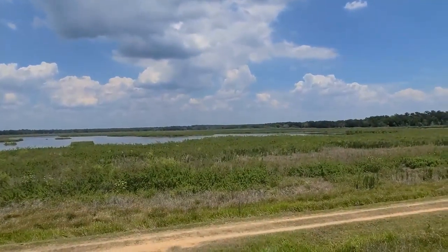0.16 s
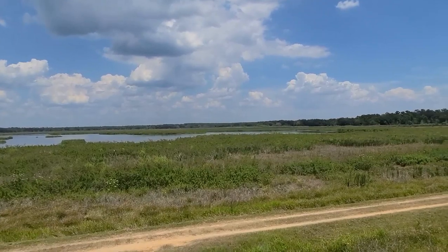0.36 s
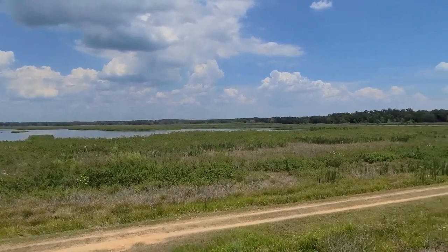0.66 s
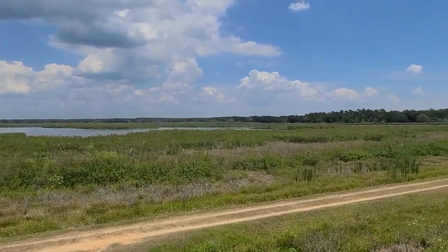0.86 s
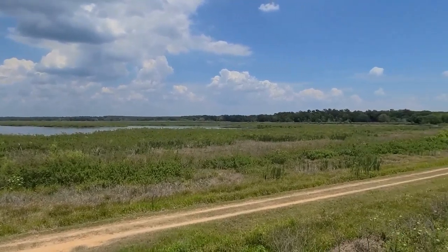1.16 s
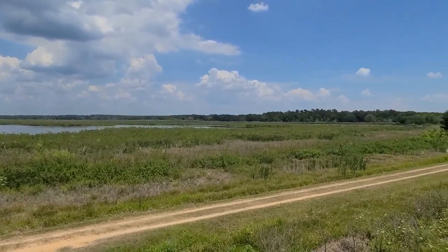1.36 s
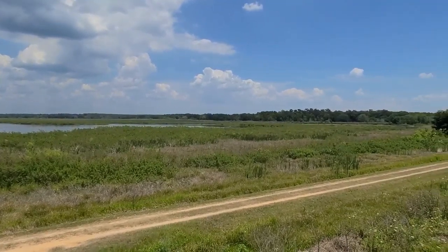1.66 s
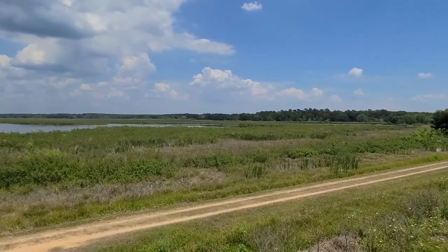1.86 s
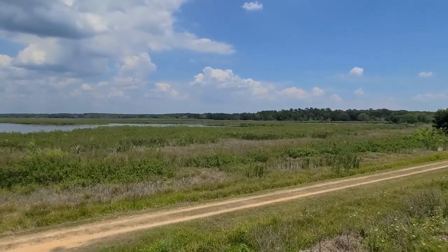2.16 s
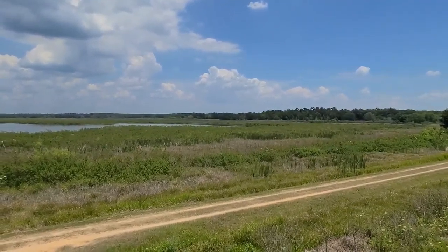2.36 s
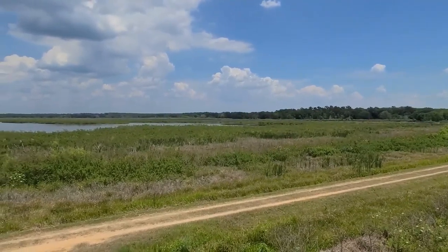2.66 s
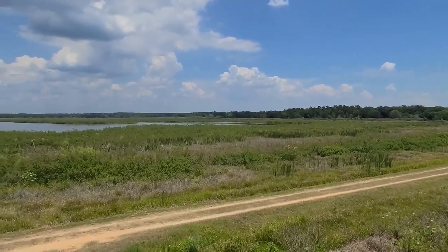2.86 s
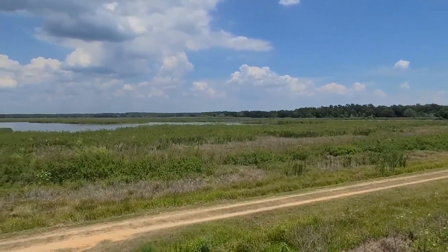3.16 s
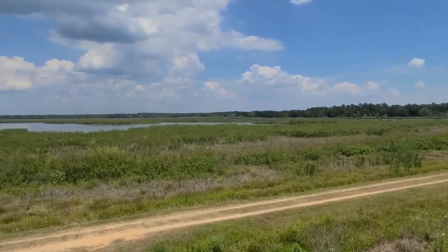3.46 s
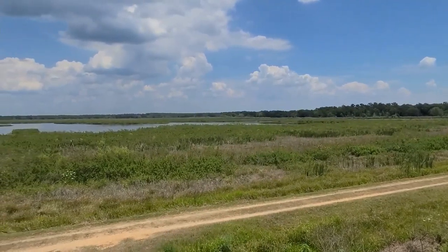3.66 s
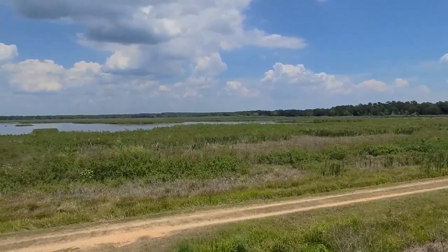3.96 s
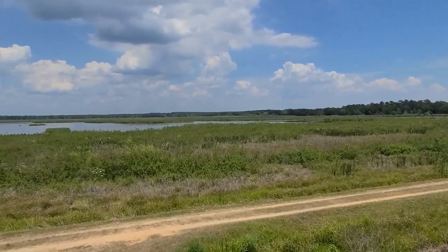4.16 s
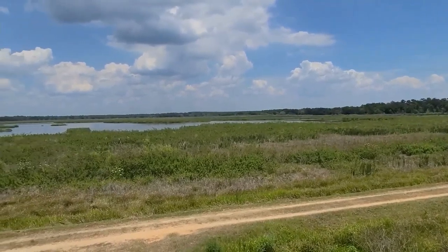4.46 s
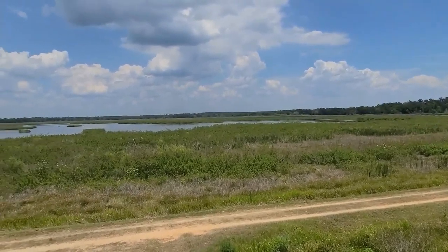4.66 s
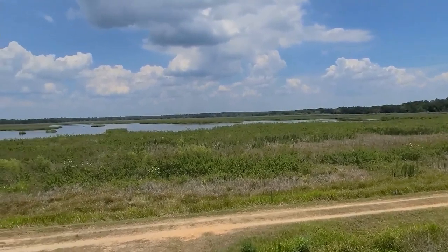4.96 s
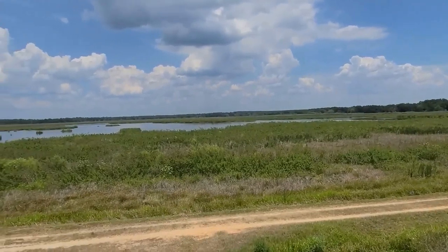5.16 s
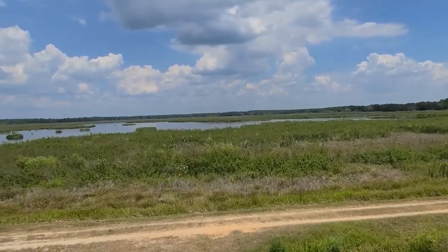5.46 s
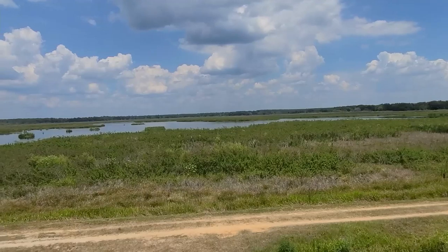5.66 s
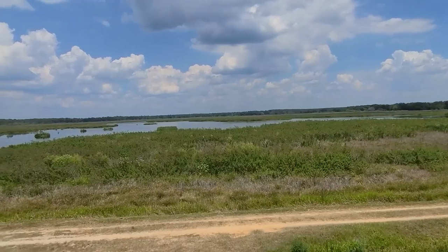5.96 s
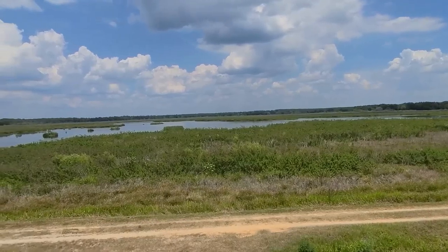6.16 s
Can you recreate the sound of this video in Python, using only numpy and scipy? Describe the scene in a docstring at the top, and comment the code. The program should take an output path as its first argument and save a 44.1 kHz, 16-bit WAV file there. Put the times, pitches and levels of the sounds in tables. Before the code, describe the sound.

A breezy wetland with nothing close by except the hands holding the microphones. Soft bassy wind buffets come and go, with early thumps, finger creaks and one clear plastic knock near one second. Short bird whistles dot the right side, thinning later. A steady shimmering cricket trill leans left until about four and a half seconds, then a higher, fainter one remains, above a faint, slowly swelling engine drone.

```python
"""Crickets trill over an open marsh: two near, two fainter, before a blur of far insects. Birds chirp, mostly
from the right, a far engine hums, wind sighs in the reeds and buffets two microphones a hand apart, and the
hand-held case is knocked, creaks and is brushed. Trills are phase-slipping tones gated by wing stroke, birds
are gliding sines, the engine is steady sines, wind and far insects are shaped noise, the knock rings decaying
modes; scattered echoes follow the trills and chirps."""
import sys
import numpy as np
from scipy import signal
from scipy.fft import rfft, irfft, next_fast_len
from scipy.io import wavfile
from scipy.ndimage import uniform_filter1d, map_coordinates

SR = 44100
rng = np.random.default_rng(int(sys.argv[2]) if len(sys.argv) > 2 else 0)


def field_ratio(decibels):
    """Amplitude ratio for a level in dB (20 dB per decade); scalars and array-likes work."""
    return 10 ** (np.asarray(decibels, dtype=float) / 20)


def to_wav(sig):
    """Store sig (one row per channel, or 1-D mono) as 16-bit WAV at the path in sys.argv[1].

    Samples outside -1..1 are clipped; the rate is SR.
    """
    pcm = np.clip(np.atleast_2d(sig), -1, 1) * 32767
    pcm = np.round(pcm).astype(np.int16)
    wavfile.write(sys.argv[1], SR, pcm.T)  # frames by channels


N = 277863
T = np.arange(N) / SR  # s

# Far insects. Each row: time in seconds, level in dB, left minus right in dB.
CHORUS = [(0, -73, -2), (1.0, -74.5, -0.5), (6.3, -76, 3)]
# Far insects' spectrum. Each row: frequency in Hz, relative density in dB per Hz.
CHORUS_SPECTRUM = [(5000, -120), (6700, -39), (7400, -8), (8200, -1), (8800, -4), (9600, -7.5),
                   (10500, -11), (11300, -20), (14000, -120)]

# Far engine. Each row: time in seconds, fundamental level in dB, octave level in dB.
HUM = [(0.0, -70, -54), (0.7, -57.5, -72), (1.52, -53.5, -62), (2.39, -53, -66), (3.1, -50.5, -56.5),
       (3.53, -54, -70), (4.38, -46.5, -63.5), (4.65, -56.5, -62.5), (5.56, -46.5, -59.5),
       (5.84, -54.5, -58), (6.3, -46.5, -56)]
HUM_HZ = 76.24
# Fainter rising engine tone. Each row: time in seconds, frequency in Hz, level in dB.
WHINE = [(3.4, 383, -86), (4.4, 390, -77), (5.2, 398, -73), (6.3, 406, -72)]

# Wind over the marsh. Each row: time in seconds, low sigh level in dB, reed hiss level in dB.
WIND = [(0, -56, -62), (1.1, -57.5, -64), (2.8, -57, -66), (4.1, -56.5, -67.5), (6.3, -55, -66.5)]
# Low sigh's spectrum. Each row: frequency in Hz, relative density in dB per Hz.
SIGH_SPECTRUM = [(50, -35.5), (85, -0.5), (119, -9.5), (254, -13), (325, -17), (405, -18), (611, -26),
                 (920, -32), (1200, -36), (1560, -66), (2640, -120)]
# Low sigh's stereo likeness. Each row: frequency in Hz, left-right correlation (1 is identical).
SIGH_ALIKE = [(60, 1), (250, 0.87), (550, 0.82), (1100, 0.6)]
# Reed hiss spectrum. Each row: frequency in Hz, relative density in dB per Hz.
REEDS_SPECTRUM = [(400, 3.5), (900, -2), (1500, -3.5), (2200, -10.5), (3200, -7), (4200, -13.5),
                  (5200, -18), (7000, -20), (11000, -43)]
# Wind on the microphone ports. Each row: time in seconds, buffet level in dB.
GUSTS = [(0, -50.5), (.55, -51), (.62, -60.5), (1.15, -55), (1.9, -58), (2.2, -47.5), (3.1, -49.5),
         (3.3, -54.5), (5, -58), (5.4, -53), (6.3, -52)]
# Buffet spectrum. Each row: frequency in Hz, relative density in dB per Hz.
BUFFET_SPECTRUM = [(12, -13), (25, -5), (40, 2.5), (62, 4.5), (85, -5.5), (120, -14.5), (200, -27.5),
                   (400, -37), (1000, -120)]
# Single eddies that thump the ports. Each row: centre in seconds, level in dB.
EDDIES = [(.07, -41.5), (.37, -37), (.47, -43.5), (2.258, -44), (2.39, -47), (2.49, -48.5), (2.7, -45.5),
          (5.071, -45.5), (5.37, -49), (5.88, -49)]
EDDY_S = 0.026

# Small bird on the right, quick high notes. Each row: centre in seconds, pitch in Hz, glide in Hz, level in dB.
TWITTER = [(.589, 4080, 270, -74.5), (0.667, 3935, -100, -64), (.768, 3770, -300, -66),
           (.918, 3530, -300, -65.5), (1.018, 3750, -100, -68.5), (1.554, 3400, -12, -67),
           (1.656, 3540, -100, -69), (1.815, 4170, -20, -77), (1.885, 3870, 8, -66.5),
           (2.02, 3550, -230, -61), (2.121, 3780, -30, -63.5), (2.264, 3830, -100, -66),
           (2.336, 4650, -150, -75), (2.393, 3800, 109, -65), (2.528, 3170, 87, -67.5),
           (2.546, 4090, 18, -78), (2.673, 3020, 122, -74), (2.68, 4020, 280, -75), (2.826, 3950, 0, -78.5),
           (3.459, 3620, 200, -73.5), (3.505, 3990, 100, -72.5), (3.55, 3900, -200, -81.5),
           (3.71, 3370, 11, -72.5), (3.734, 4050, -350, -72.5), (3.826, 3850, -38, -69),
           (3.876, 4300, -410, -77.5), (3.976, 3820, -100, -72), (4.008, 3320, -300, -62),
           (4.131, 3795, 0, -73.5), (4.396, 3680, -130, -70), (4.499, 3780, -390, -73),
           (4.699, 4220, 100, -81), (4.847, 3240, -10, -72.5), (4.87, 4300, -300, -78.5),
           (4.975, 3850, -130, -80.5), (5.372, 3780, -280, -73), (5.449, 3970, 100, -77),
           (5.885, 3920, -600, -72)]
TWITTER_MS, TWITTER_PAN_DB = 26, -5  # shortest note; left minus right
SMEAR_MS_PER_DB = 1.8  # the fainter (further) a high note, the longer it is drawn out
# Other birds round about, lower notes. Each row: centre in seconds, length in ms, pitch in Hz, glide in Hz,
# level in dB, left minus right in dB.
CALLS_LOW = [(0.457, 40, 3420, 6, -62.5, 2.5), (.471, 61, 2790, 0, -74, -0.5),
             (1.151, 70, 2840, -330, -65.5, -9), (1.405, 38, 3125, 2, -63, 4.5),
             (1.67, 54, 2460, -350, -77, -10), (1.846, 40, 2470, -400, -62.5, -1),
             (2.324, 34, 3510, -2, -59.5, -7), (2.327, 41, 2546, 0, -70, -4.5),
             (2.339, 25, 2920, 0, -65, -0.5), (5.013, 37, 2190, 2, -75, -1),
             (5.016, 42, 3210, -300, -63, -10.5), (5.022, 37, 2570, 0, -60, -6),
             (5.371, 38, 3056, -350, -58.5, 2), (5.395, 26, 2690, -200, -71, -1),
             (5.836, 26, 2990, -30, -70, -5.5)]
# faint notes of the same small birds at random moments: mean pitch, its spread, mean level
CHATTER_COUNT, CHATTER_HZ, CHATTER_SPREAD_HZ, CHATTER_DB = 30, 3850, 340, -83

# Knocks on the case. Each row: start in seconds, scuff level in dB, thump level in dB.
KNOCKS = [(1.054, -42, -33)]
# Ringing modes of the plastic case. Each row: frequency in Hz, relative level in dB, 60 dB decay in seconds.
CASE_MODES = [(660, -14, .02), (942, -12, .02), (1350, -15, .02), (1880, 0, .018), (3300, -4, .018),
              (3750, -9, .016)]
RING_OVER_DB = 23.5  # the case modes at full contact, over the scuff
# Finger creaks on the case. Each row: centre in seconds, pulse width in ms, level in dB.
TAPS = [(.4765, .8, -52), (.4905, .5, -46), (.4965, .5, -52), (.7985, .19, -50), (.8025, .19, -54)]
# Brushes on the case. Each row: centre in seconds, length in ms, centre frequency in Hz, level in dB.
BRUSHES = [(0.104, 20, 6300, -67.5), (0.342, 29, 1500, -68), (0.486, 120, 567, -61.5),
           (0.801, 14, 1030, -60), (1.399, 38, 1290, -69.5), (1.689, 40, 2200, -73),
           (2.329, 28, 1200, -68.5), (2.539, 37, 2800, -73), (3.062, 66, 2420, -71.5),
           (4.01, 55, 1490, -69), (5.667, 49, 4500, -75.5)]

# Near low cricket's long bout. Each row: time in seconds, level in dB.
NEAR = [(0, -72), (.54, -77), (.69, -69), (1.0, -72.5), (1.75, -78), (1.92, -73), (2.67, -75.5), (3.9, -74),
        (4.35, -68.5), (4.4, -70)]
# Its short last burst. Each row: time in seconds, level in dB.
AFTER = [(4.52, -78), (4.54, -75), (4.585, -84)]
# Its wing tone. Each row: time in seconds, frequency in Hz.
NEAR_WING = [(0, 8850), (.5, 8815), (1.1, 8870), (2.0, 8890), (3.0, 8915), (3.5, 8975), (4.4, 8975),
             (4.55, 8900)]
# Its place, nearing the middle as the microphones turn. Each row: time in seconds, left minus right in dB.
NEAR_SIDE = [(0, -10.5), (4.6, -7.5)]
NEAR_STROKES_PER_S = 74.14
# Near high cricket. Each row: time in seconds, level in dB.
HIGH = [(2.3, -92), (3.3, -94), (3.8, -89.5), (4.83, -80.5), (5.62, -84), (5.78, -79), (6.3, -79.5)]
# Its wing tone. Each row: time in seconds, frequency in Hz.
HIGH_WING = [(2.3, 10130), (3.2, 10270), (4.0, 10330), (4.7, 10370), (6.3, 10392)]
# Its pace. Each row: time in seconds, wing strokes per second.
HIGH_PACE = [(4.95, 73.05), (5.3, 72.56)]
HIGH_PAN_DB, WAVER_DB = -1, -0.5  # left minus right; how much every trill swells and sinks
# Third cricket, further off. Each row: time in seconds, level in dB.
FAINT = [(0, -76), (.8, -92), (1.75, -95), (1.95, -81), (2.55, -81), (3.1, -88), (3.4, -100), (4.7, -84),
         (4.9, -86)]
# Fourth cricket, lower and as faint. Each row: time in seconds, level in dB.
FOURTH = [(2.2, -94), (2.6, -85), (3.6, -84), (4.1, -92)]

# Echoes off reeds and ground. Each row: frequency in Hz, 60 dB decay in seconds.
FIELD = [(2000, 0.13), (5000, 0.24), (10000, 0.045)]
# Microphones' own noise. Each row: frequency in Hz, relative density in dB per Hz.
HISS_SPECTRUM = [(1500, -10), (5000, -11.5), (7000, -5), (11000, -1.5), (13000, 0.5), (15700, -5.5)]


def unit(x):
    """Scaled to rms 1."""
    return x / np.sqrt(np.mean(x ** 2) + 1e-20)


def along(points, hz):
    """(Hz, value) points interpolated on a log frequency axis."""
    f, v = np.transpose(points)
    return np.interp(np.log(hz + 1), np.log(f + 1), v, left=v[0], right=v[-1])


def curves(rows):
    """One value per sample for each column after the time."""
    s, *cols = np.transpose(rows)
    return [np.interp(T, s, c) for c in cols]


def sounding(rows):
    """1 while a table lasts, with 10 ms fades just outside it."""
    since_s, left_s = T - rows[0][0], rows[-1][0] - T
    return np.clip(np.minimum(since_s + .01, left_s + .01) / .01, 0, 1)


def wobble(knots_per_s):
    """A smooth random curve."""
    knots = rng.standard_normal(int(N * knots_per_s / SR) + 4)
    return map_coordinates(knots, [T * knots_per_s])


def filtered(x, response):
    """x times a complex response of frequency."""
    m = next_fast_len(x.shape[-1] + 8192)
    spectrum = rfft(x, m) * response(np.fft.rfftfreq(m, 1 / SR))
    return irfft(spectrum, m)[..., :x.shape[-1]]


def placed(x, pan_db, lag_ms):
    """One sound at both microphones; the left one hears it lag_ms later."""
    side = np.array([[1], [-1]])
    pair = filtered(x, lambda hz: np.exp(-1j * np.pi * hz * lag_ms / 1000 * side))
    return pair * field_ratio(np.array([pan_db / 2, -pan_db / 2]).reshape(2, -1))


def rush(spectrum, alike, patchy_db, lag_ms):
    """Stereo noise of rms 1 with time-frequency patches of random gain and a set left-right likeness."""
    z = signal.stft(rng.standard_normal((2, N)), nperseg=512)[2]
    patches = uniform_filter1d(rng.standard_normal(z.shape[1:]), size=6, axis=0)
    patches = uniform_filter1d(patches, size=10, axis=1)
    pair = signal.istft(z * field_ratio(patchy_db * unit(patches)), nperseg=512)[1][:, :N]

    def mid_side_gains(hz):
        angle = np.arccos(np.clip(along(alike, hz), -1, 1)) / 2
        return field_ratio(along(spectrum, hz)) * [np.cos(angle), np.sin(angle)]

    mid, side = filtered(pair, mid_side_gains)
    return unit(placed(np.array([mid + side, mid - side]), 0, lag_ms))


def chorus():
    """The blur of many far insects: band-shaped noise."""
    level_db, pan_db = curves(CHORUS)
    noise = rush(CHORUS_SPECTRUM, [(8000, 0.12)], patchy_db=1.5, lag_ms=0.481)
    return field_ratio(level_db) * field_ratio([pan_db / 2, -pan_db / 2]) * noise


def engine():
    """A slightly unsteady low tone with its octave, and a faint higher one that rises."""
    low_db, octave_db = curves(HUM)
    whine_hz, whine_db = curves(WHINE)
    phase = 2 * np.pi * np.cumsum(HUM_HZ + 0.35 * wobble(2.897)) / SR
    low = field_ratio(low_db + 2.03 * wobble(3.9)) * np.sin(phase)
    octave = field_ratio(octave_db + 2.0 * wobble(5)) * np.sin(2 * phase + 1)
    whine_phase = 2 * np.pi * np.cumsum(whine_hz + 0.79 * wobble(4)) / SR
    whine = field_ratio(whine_db + 1.1 * wobble(1.9)) * sounding(WHINE) * np.sin(whine_phase)
    return placed(low + octave + whine, -1.4, lag_ms=0.075)


def wind():
    """Wind noise over the marsh: a low sigh and the reeds' hiss arrive from the right."""
    sigh_db, reeds_db = curves(WIND)
    sigh_noise = rush(SIGH_SPECTRUM, SIGH_ALIKE, patchy_db=0.9, lag_ms=0.32)
    sigh = field_ratio(sigh_db + 0.32 * wobble(5.2)) * sigh_noise
    reeds_alike = [(1000, 0.21), (6000, 0.086), (12000, 0.02)]
    reeds_noise = rush(REEDS_SPECTRUM, reeds_alike, patchy_db=1.5, lag_ms=0.474)
    reeds = field_ratio(reeds_db + .8 * wobble(8)) * reeds_noise
    return field_ratio([[-.6], [.6]]) * (sigh + reeds)


def buffet():
    """Turbulence thumps each port almost independently: lumpy low noise, louder in single eddies."""
    eddies = sum(field_ratio(db) * np.exp(-((T - s) / EDDY_S) ** 2) for s, db in EDDIES)
    lumps = field_ratio(2.2 * np.array([wobble(14), wobble(7.2)]))
    noise = rush(BUFFET_SPECTRUM, [(30, 0.065)], patchy_db=-0.5, lag_ms=0)
    return (field_ratio(curves(GUSTS)[0]) + eddies) * unit(lumps * noise)


def note_rows():
    """Every bird note as (centre s, length ms, Hz, glide Hz, dB, left minus right dB)."""
    chance = rng.standard_normal((CHATTER_COUNT, 3))
    when_s = rng.uniform(.1, N / SR - .1, CHATTER_COUNT)
    chatter = [(s, CHATTER_HZ + CHATTER_SPREAD_HZ * a, 200 * b - 120, CHATTER_DB + 0.52 * c)
               for s, (a, b, c) in zip(when_s, chance)]
    high = []
    for s, hz, glide_hz, db in TWITTER + chatter:
        ms = TWITTER_MS + SMEAR_MS_PER_DB * max(-68 - db, 0)
        high.append((s, ms, hz, glide_hz, db, TWITTER_PAN_DB))
    return high + CALLS_LOW


def birds():
    """Short gliding whistles, roughened by distance; the further right, the later at the left microphone."""
    out = np.zeros((2, N + SR))
    for s, ms, hz, glide_hz, db, pan_db in note_rows():
        u = np.linspace(-.5, .5, int(ms * SR / 1000))
        flutter = uniform_filter1d(rng.standard_normal((3, 4096)), size=90, axis=1)
        flutter = flutter[:, :len(u)] * np.sqrt(90)
        # each note drops into its pitch within a few milliseconds
        drop_hz = 260 * (np.exp(-(u + .5) * ms / 4) - .1)
        phase = 2 * np.pi * np.cumsum(hz + glide_hz * u + drop_hz + 35 * flutter[0]) / SR
        # moving air scatters the tone into a band of noise around it, the more the fainter the bird
        share = np.clip(.3 + .08 * (-66 - db), .35, .9)
        rough = share * (flutter[1] * np.sin(phase) + flutter[2] * np.cos(phase))
        envelope = np.cos(np.pi * u) ** 0.9 * np.exp(-.8 * u)
        note = envelope * field_ratio(db) * (np.sin(phase) + rough)
        start = round(s * SR) - len(u) // 2
        lag = round(np.clip(-4.2 * pan_db, -22, 22))  # samples
        out[0, start + lag:][:len(u)] += field_ratio(pan_db / 2) * note
        out[1, start:][:len(u)] += field_ratio(-pan_db / 2) * note
    return out[:, :N]


def knocks():
    """A knock scuffs and rings the plastic case and pushes the diaphragms at 85 Hz."""
    out, t = np.zeros((2, N + SR)), np.arange(SR // 4) / SR
    for s, scuff_db, thump_db in KNOCKS:
        rise = (1 - np.exp(-t / .004)) ** 5  # the contact builds up over some milliseconds
        ring = np.zeros(len(t))
        for hz, db, t60_s in CASE_MODES:
            decay = field_ratio(db + rng.normal(0, 0.39) - 60 * t / t60_s)
            ring += decay * np.sin(2 * np.pi * hz * t + rng.uniform(0, 6.6))
        crack = unit(filtered(rng.standard_normal(len(t)), lambda f: 1 / (1 + (f / 2500) ** 1.7)))
        scuff = field_ratio(scuff_db - 60 * t / .045) * (1 - np.exp(-t / .004)) * crack
        push = (field_ratio(-60 * t / 0.19) + 2.3 * field_ratio(-60 * t / 0.018)) * (1 - np.exp(-t / 0.0018))
        thump = field_ratio(thump_db) * push * np.sin(2 * np.pi * 85 * t)
        start = round(s * SR)
        out[:, start:start + len(t)] += field_ratio(scuff_db + RING_OVER_DB) * rise * ring + scuff + thump
    return out[:, :N]


def creaks():
    """Finger creaks: single pulses, a downward peak between two upward lobes, alike at both microphones."""
    out = np.zeros((2, N))
    for s, ms, db in TAPS:
        u = (T - s) * 1000 / ms
        out -= field_ratio(db) * (1 - u ** 2) * np.exp(-u ** 2 / 2)
    return out


def brushes():
    """Brushes on the case: short puffs of broad noise, mostly shared by the microphones."""
    out, t = np.zeros((2, N + SR)), np.arange(SR // 4) / SR
    for s, ms, hz, db in BRUSHES:
        u = (t - t.mean()) * 1000 / ms
        noise = rng.standard_normal((3, len(t)))
        broad = lambda f: np.exp(-(np.log((f + 1) / hz) / 0.62) ** 2)
        puff = unit(filtered(noise[1:] + 3.6 * noise[0], broad)) * np.exp(-8 * u ** 2)
        start = round(s * SR) - len(t) // 2
        out[:, max(start, 0):start + len(t)] += field_ratio(db) * puff[:, max(-start, 0):]
    return out[:, :N]


def trill(wing_hz, strokes, sharp, shoulder, scatter_db, slip):
    """Each wing stroke is a short tone with a weaker lead-in, of new size, pitch and slipped phase."""
    k = np.floor(strokes + .5).astype(int)  # stroke number
    k -= k.min()
    chance = rng.standard_normal((k.max() + 1, 3))
    hump = lambda at: np.exp(sharp * (np.cos(2 * np.pi * (strokes - at)) - 1))
    size = field_ratio(scatter_db * chance[k, 0] + 0.73 * wobble(19))
    gate = (hump(0) + shoulder * hump(-0.3)) * size
    pitch_hz = wing_hz + 25 * chance[k, 2]
    slipped = np.cumsum(slip * chance[:, 1])[k]
    return unit(gate * np.sin(2 * np.pi * np.cumsum(pitch_hz) / SR + slipped))


def crickets():
    """Two near trills and two fainter ones, each a wing tone pulsed at its own stroke rate."""
    level = lambda rows: field_ratio(curves(rows)[0] + WAVER_DB * wobble(5.7)) * sounding(rows)
    near_strokes = NEAR_STROKES_PER_S * T + .21
    high_strokes = np.cumsum(curves(HIGH_PACE)[0]) / SR + .39
    near = trill(curves(NEAR_WING)[0], near_strokes, sharp=2.5, shoulder=0.38, scatter_db=1.5, slip=2.0)
    near *= level(NEAR) + level(AFTER)
    high = trill(curves(HIGH_WING)[0], high_strokes, sharp=2.1, shoulder=0.47, scatter_db=1.5, slip=1.6)
    high *= level(HIGH)
    third_hz, fourth_hz = 8620 + 15 * wobble(2.2), 8240 + 15 * wobble(2.7)
    third = trill(third_hz, 88.0 * T, sharp=0.51, shoulder=0.34, scatter_db=-2.0, slip=0.93)
    fourth = trill(fourth_hz, 91.0 * T, sharp=0.74, shoulder=0.2, scatter_db=2.5, slip=1.0)
    faint = level(FAINT) * third + level(FOURTH) * fourth
    near_pan_db = curves(NEAR_SIDE)[0] + 2.5 * wobble(4.5)
    out = placed(near, near_pan_db, lag_ms=0.482)
    out += placed(high, HIGH_PAN_DB, lag_ms=-0.401)
    return out + placed(faint, -0.5, lag_ms=.45)


def field(x):
    """Scattered echoes, unlike at the two microphones, with a new pattern every third of a second."""
    hop, out = SR // 3, np.zeros((2, N + SR))
    for start in range(0, N, hop):
        hz, t, z = signal.stft(rng.standard_normal((2, SR // 3)), SR, nperseg=256)
        decay = field_ratio(-60 * t / along(FIELD, hz)[:, None])
        tail = signal.istft(z * decay, SR, nperseg=256)[1]
        wet = signal.fftconvolve(x[:, start:start + hop], tail / np.linalg.norm(tail[0]), axes=1)
        out[:, start:start + wet.shape[1]] += wet
    return out[:, :N]


def scene():
    """Everything at the two microphones."""
    trills, chirps = crickets(), birds()
    echoes = field(field_ratio(-5.5) * trills + field_ratio(-7.0) * chirps)
    background = chorus() + engine() + wind() + buffet()
    handling = knocks() + creaks() + brushes()
    return background + chirps + handling + trills + echoes


def roll_off(x):
    """The treble ends steeply here."""
    return signal.sosfilt(signal.butter(12, 15680, fs=SR, output="sos"), x)


def record(dry):
    """The microphones add steady hiss, each its own."""
    hiss = unit(filtered(rng.standard_normal((2, N)), lambda hz: field_ratio(along(HISS_SPECTRUM, hz))))
    mix = dry + field_ratio([[-81.5], [-80.5]]) * hiss
    return roll_off(mix)


dry = scene()
out = record(dry)
to_wav(out)
```